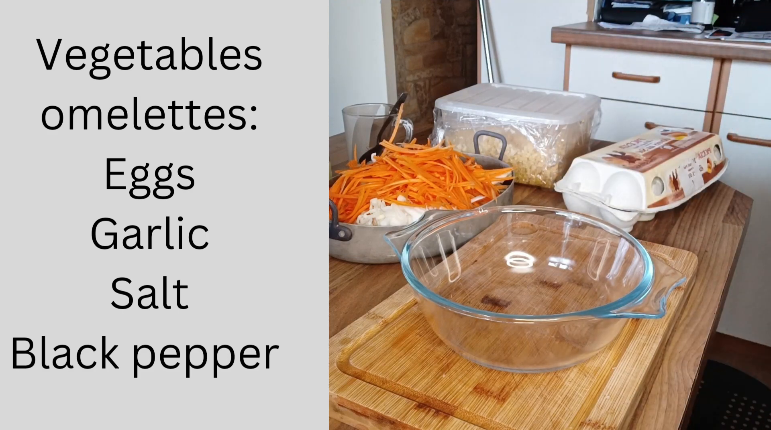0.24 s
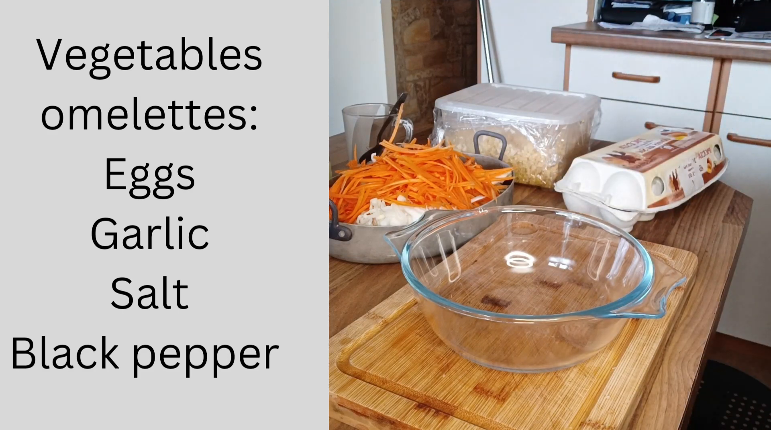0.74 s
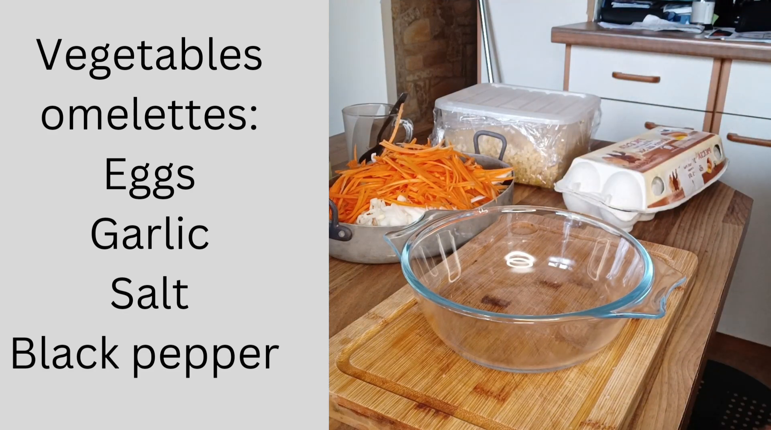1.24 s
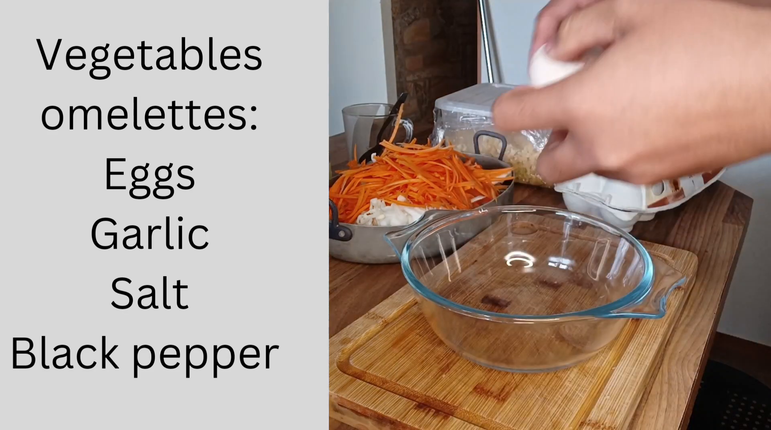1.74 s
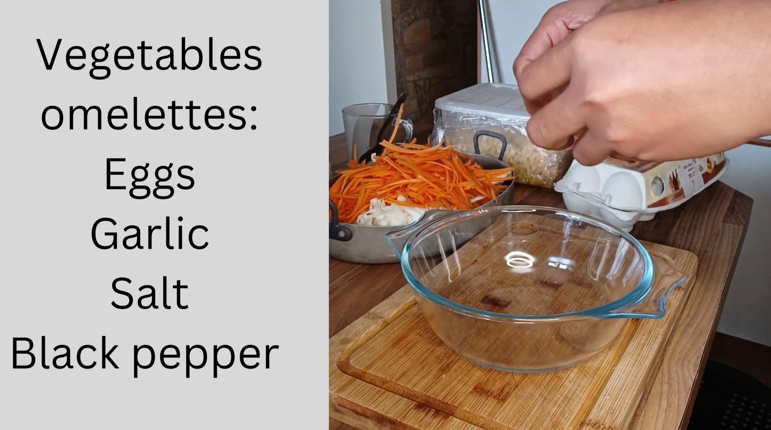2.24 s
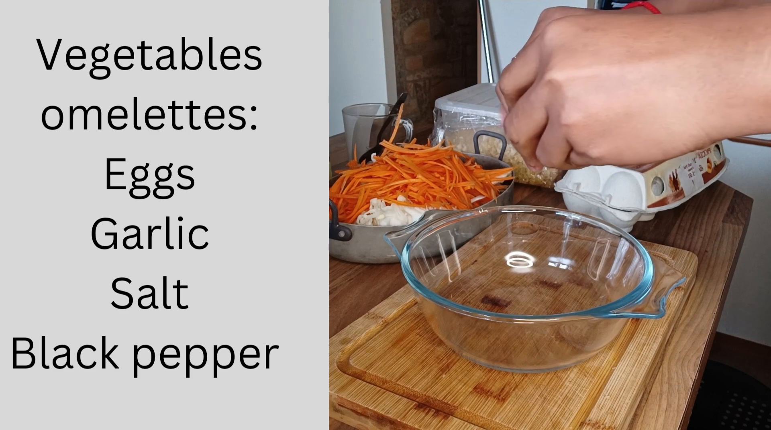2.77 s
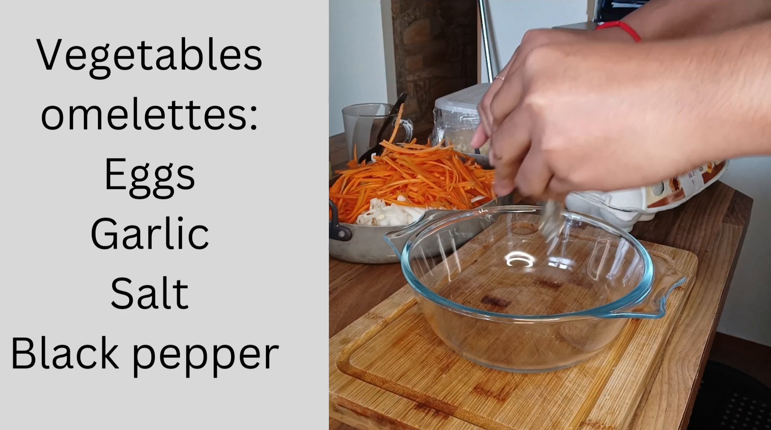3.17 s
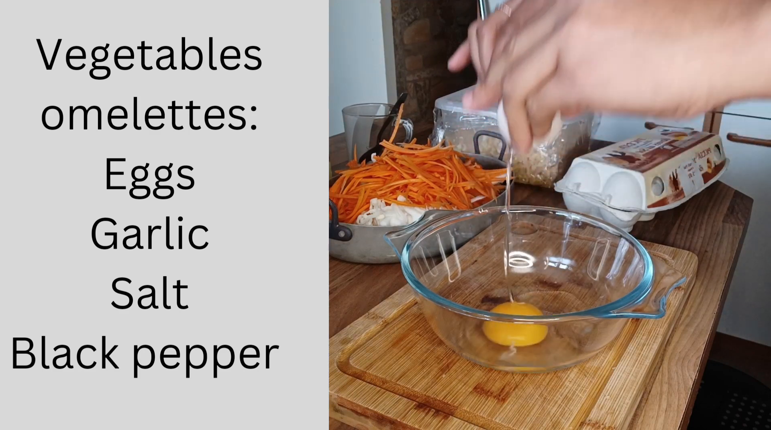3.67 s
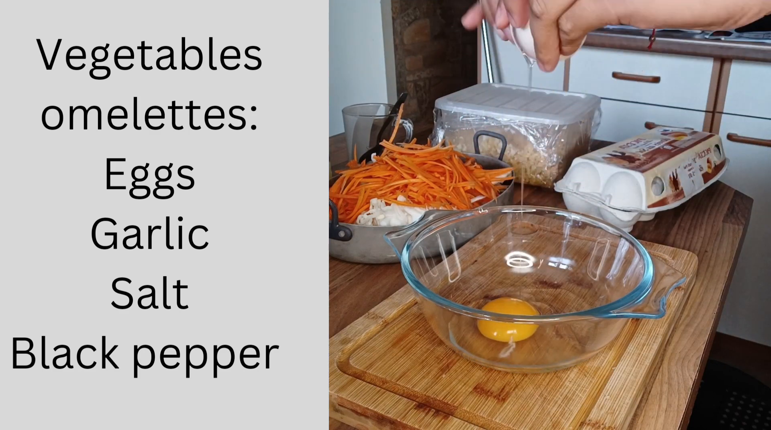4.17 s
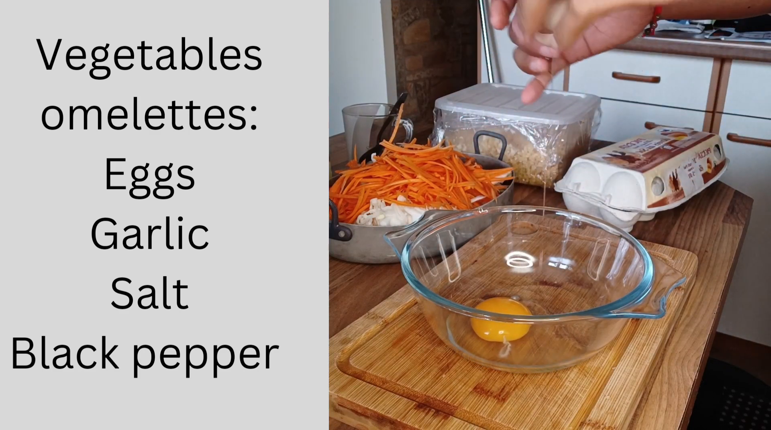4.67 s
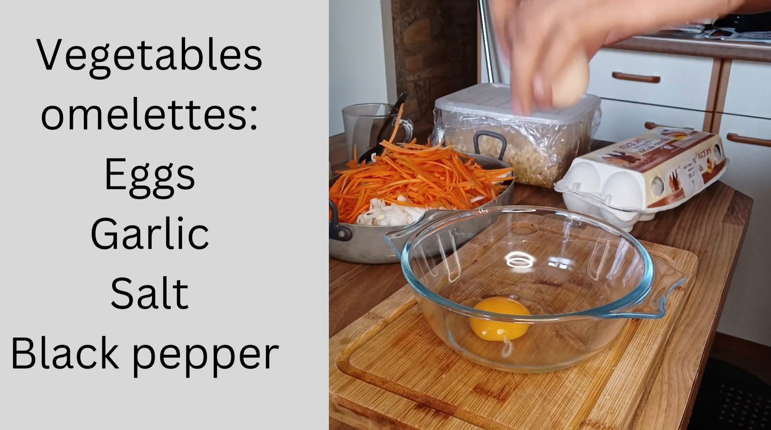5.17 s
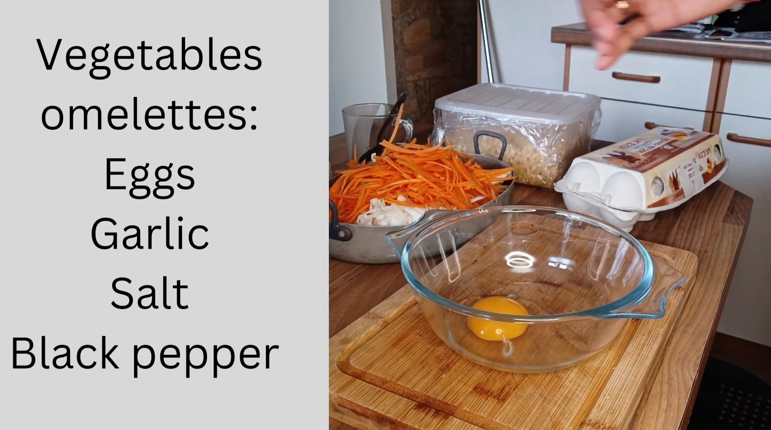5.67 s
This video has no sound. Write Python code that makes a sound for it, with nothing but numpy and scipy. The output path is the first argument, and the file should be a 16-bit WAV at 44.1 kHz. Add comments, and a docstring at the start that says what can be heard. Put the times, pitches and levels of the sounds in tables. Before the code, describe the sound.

A faint appliance hum and soft room air run throughout, heard from a microphone close to a wooden kitchen table. At about 0.8 and 1.2 seconds an egg is knocked twice; each blow is a sharp shell crack with a resonant thud through the table top, the second slightly softer. These are the loudest sounds. At 2.4 seconds the shell snaps lightly as fingers pry it, followed by faint crackling and a crisper break near 3.1 seconds, with a quick run of hollow ticks. From about 3.2 to 3.8 seconds the egg slides into a glass bowl with a very soft squelch, a few tiny bubbles and more shell snaps. The empty halves click and tick around 4.3 and 4.6 seconds, and once more at 5 seconds. Hard walls nearby give the cracks a short echo. Only the hum remains until almost 6 seconds.

```python
"""Cracking an egg in a kitchen

Close on a wooden table, one small microphone. An egg is knocked twice, shaking the table top, then
pried open over a glass bowl: the shell snaps and crackles, its hollow halves tick together, and the
egg slides out softly with a few bubbles. Hard walls close by answer the cracks and ticks; an
appliance hums faintly in the background."""
import sys
import numpy as np
from scipy import signal
from scipy.fft import rfft, irfft, next_fast_len
from scipy.io import wavfile
from scipy.ndimage import uniform_filter1d, minimum_filter1d, map_coordinates

SR = 44100
rng = np.random.default_rng(int(sys.argv[2]) if len(sys.argv) > 2 else 0)


def wav_record(signal):
    """Record a signal, one row per channel, as 16-bit PCM in the file named by sys.argv[1]."""
    frames = np.transpose(np.atleast_2d(signal))
    bounded = np.clip(frames, -1, 1)
    # unit amplitude maps onto the largest positive 16-bit level
    quanta = np.round(bounded * 32767).astype(np.int16)
    wavfile.write(sys.argv[1], SR, quanta)


N = 261072

# Event levels are relative: each source adds its own gain.
# blows on the table: t/s, thud/dB, low thump/dB, crack/dB, swell time/s, early t60/s
KNOCKS = [(0.7742, 1.5, -22.5, -16.5, 0.034, 0.43), (1.2277, -1, -19, -15.5, 0.012, 0.38)]
# thud spectra, the whole egg hitting hard and the dented egg softer: f/Hz, level/dB
HARD_BLOW = [(45, -47.5), (75, -23.5), (170, -7.5), (270, -14.5), (650, -6.5), (1000, -5.5), (1400, 0.5),
             (2150, -12), (2900, -17), (3500, -30), (6500, -27.5), (9400, -24.5), (12000, -34.5),
             (16000, -45.5)]
SOFT_BLOW = [(45, -46), (75, -12), (130, -8.5), (270, -8), (850, -10.5), (1080, -4.5), (1550, -8),
             (1850, -25), (2150, -9), (2750, -22), (3100, -20), (3450, -28.5), (6900, -31), (9500, -20.5),
             (16000, -44.5)]
# modes of the table and what stands on it: f/Hz, level/dB
TABLE_MODES = [(75, 10), (101, 6.5), (117, -7.5), (139, -1), (166, 7), (215, 10.5), (323, 10), (370, 2),
               (431, 0), (447, -0.5), (502, 6), (651, 0.5), (678, 7), (747, -1), (807, 8.5), (1011, 6.5),
               (1140, -2), (1194, -8.5), (1332, -3), (1361, 1.5), (1388, -3.5), (1416, -1), (1581, 7.5),
               (1672, 3), (1704, 5.5), (1749, 7), (2160, -3), (2260, -0.5), (2729, 2.5), (2902, 8)]
# spectrum of the countless weak modes between them: f/Hz, level/dB
WEAK_MODES = [(100, 0.5), (400, -1), (1500, -1), (2500, -1.5)]
# the deep bass is cut from the knocks: f/Hz, gain/dB
KNOCK_LOW_CUT = [(52, -19.5), (70, -1.5)]
# the shell breaks: t/s, crack/dB, brightness/dB, hollow ring/dB, ring f/Hz
SNAPS = [(2.42, -34.5, -6, -28, 1420), (2.445, -33, -5, -32.5, 1510), (2.751, -51, -2, -58, 2220),
         (2.853, -53, 8, -66, 1700), (3.0788, -33, -20, -34, 1860), (3.0801, -27.5, -27, -38, 1950),
         (3.0875, -32, 11, -35, 2030), (3.364, -42, -5, -55, 1900), (3.477, -46, 9, -56, 3540),
         (3.5846, -35, 13, -29, 1970), (3.732, -48.5, 9, -44, 2390), (3.813, -44.5, 0, -42.5, 2520),
         (4.261, -42, 0, -40, 2570), (4.326, -42, -1, -44, 2070), (4.342, -41.5, 5, -44, 2110),
         (4.621, -33, 1.5, -33.5, 2280), (4.86, -48.5, -9, -60, 2320)]
# spectrum of a shell crack, with the microphone's bright peak near 9.5 kHz: f/Hz, level/dB
CRACK_SPECTRUM = [(300, -25.5), (900, -16.5), (2600, 2.5), (4300, -9), (6100, -5), (7800, -4), (9600, 5),
                  (11500, -7), (13500, -9.5), (16000, -15)]
# the halves touch: t/s, ring/dB, ring f/Hz, click of the broken edges/dB
TICKS = [(3.111, -30.5, 2950, -30), (3.1437, -27, 2390, -42.5), (3.1768, -30.5, 2190, -50),
         (3.2025, -40, 2140, -57), (3.271, -47, 1730, -60), (3.5625, -45, 2250, -63),
         (3.5696, -40.5, 2050, -54), (3.799, -45.5, 2370, -51.5), (4.577, -29.5, 2170, -51),
         (4.5874, -33, 2270, -54), (4.664, -39.5, 2050, -54), (5.0225, -35, 1870, -45.5)]
# the fingers squeeze the egg: t/s, hold/s, crackle/dB, fracture rate/Hz, wet sound/dB
SQUEEZES = [(2.414, 0.032, -60, 750, -57), (2.745, .21, -82, 82, -69), (3.08, 0.043, -59, 700, -52),
            (3.358, .05, -92, 230, -62.5), (3.551, 0.021, -73, 360, -54.5), (3.775, .03, -90, 200, -61.5),
            (4.594, 0.018, -70, 480, -54.5), (4.836, 0.1, -78, 340, -64)]
# spectrum of the hollow under tiny fractures: f/Hz, level/dB
HOLLOW_SPECTRUM = [(800, -29), (1700, 0.5), (2800, -3), (3800, -11), (7000, -35)]
# spectrum of the sliding egg: f/Hz, level/dB
WET_SPECTRUM = [(50, -3), (90, 4), (200, -1), (350, -8.5), (700, -10), (1800, -14.5), (3000, -24),
                (6000, -40)]
# bubbles in the egg white: t/s, ring/dB, ring f/Hz
BUBBLES = [(3.25, -51.5, 3000), (3.321, -56.5, 3190), (3.3515, -42, 1780), (3.478, -54, 3540),
           (3.537, -44.5, 1840)]
# reverberation of the kitchen: f/Hz, t60/s
KITCHEN_DECAY = [(100, 0.25), (500, 0.52), (2000, 0.22), (6000, 0.23), (10000, 0.2), (16000, 0.21)]
# spectrum of the room's air: f/Hz, level/dB
AIR_SPECTRUM = [(25, 3.5), (50, -14.5), (72, -5), (150, -8.5), (400, -15.5), (800, -20), (1700, -14.5),
                (3000, -25), (4200, -33.5), (6200, -39), (7700, -35.5), (9200, -28), (12000, -43.5),
                (16000, -43.5)]
# its slow rise and fall: t/s, level/dB
AIR_LEVEL = [(0, -67), (1.2, -63.5), (1.9, -66.5), (3, -65), (4.1, -65.5), (5.3, -63.5), (5.9, -64.5)]
# hum and faint whine of the appliance: f/Hz, rms level/dB
HUM_TONES = [(100, -71), (595, -71.5), (645, -85.5), (744, -87.5), (3560, -97), (4960, -98), (8430, -99),
             (8985, -97)]


def knocks(onset_gain=0.64, modes_db=-30, ring_rise_s=0.0013, thump_hz=122, thump_t60=0.07):
    """Each blow cracks the shell and shakes the table; the thud holds, as if compressed, then dies."""
    out, t = np.zeros(N), np.arange(SR // 2) / SR
    for (s, thud_db, thump_db, crack_db, swell_s, t60), blow in zip(KNOCKS, (HARD_BLOW, SOFT_BLOW)):
        ring = sum(amp(modes_db + db + rng.normal(0, 1)) * np.sin(2 * np.pi * (hz * t + rng.random()))
                   for hz, db in TABLE_MODES)
        ring *= 1 - np.exp(-t / ring_rise_s)
        weak_modes = coloured(rng.standard_normal(len(t)), WEAK_MODES)
        swell = 1 - (1 - onset_gain) * np.exp(-(t / swell_s) ** 2)  # briefly offsets the decay
        decay = amp(-60 * t / t60) * np.exp(-(t / (0.78 * t60)) ** 4)  # the tail's end falls faster
        thud = amp(thud_db) * coloured((ring + weak_modes) * swell * decay, blow)
        thump = amp(thump_db - 60 * t / thump_t60) * np.sin(2 * np.pi * thump_hz * t)  # the top bounces
        wood = coloured(thud + thump, KNOCK_LOW_CUT)
        crack = amp(crack_db + 10) * fracture(t, t60=0.021, bright_db=4.5)
        add(out, s, wood + kitchen(crack, wet_db=-4.5))
    return out


def snaps(ring_t60=0.0034):
    """Over the bowl the shell cracks sharply and rings its hollow for an instant."""
    out = np.zeros(N)
    for s, crack_db, bright_db, ring_db, hz in SNAPS:
        add(out, s, click(ring_db, hz, ring_t60, crack_db, bright_db))
    return out


def ticks(ring_t60=0.0068):
    """The two halves touch: mostly hollow ring, with a click from the broken edges."""
    out = np.zeros(N)
    for s, ring_db, hz, edge_db in TICKS:
        add(out, s, click(ring_db, hz, ring_t60, edge_db, bright_db=-9))
    return out


def crackle(spread_db=4, gain_db=2):
    """Tiny fractures run through the shell under the thumbs; some of them ring its hollow."""
    out, t = np.zeros(N), np.arange(SR) / SR
    def grains(spectrum, rate):
        impulses = (rng.random(len(t)) < rate / SR) * amp(spread_db * rng.standard_normal(len(t)))
        return unit(coloured(impulses, spectrum))
    for s, hold, db, rate, _ in SQUEEZES:
        shell = grains(CRACK_SPECTRUM, rate) + grains(HOLLOW_SPECTRUM, rate)
        pressure = squeeze(t, hold, attack_s=0.016, release_db_per_s=298)
        add(out, s, amp(db + gain_db) * shell * pressure)
    return kitchen(out, wet_db=1)


def squelch(lumpy_db=-1.5, gain_db=-5):
    """The egg follows each squeeze slowly, shifting and sliding in soft lumps."""
    flow, t = np.zeros(N), np.arange(SR) / SR
    for s, hold, _, _, db in SQUEEZES:
        add(flow, s, amp(db) * squeeze(t, hold, attack_s=0.038, release_db_per_s=94))
    return noise(WET_SPECTRUM, N) * flow * amp(lumpy_db * wobble(30) + gain_db)


def bubbles(ring_t60=0.023):
    """As the white runs out, a bubble's film bursts faintly; it rings longer than the shell does."""
    out = np.zeros(N)
    for s, ring_db, hz in BUBBLES:
        add(out, s, click(ring_db, hz, ring_t60, crack_db=ring_db - 13.5, bright_db=1))
    return out


def click(ring_db, hz, ring_t60, crack_db, bright_db):
    """A sharp crack and the small cavity that it rings, both answered by the kitchen."""
    t = np.arange(SR // 2) / SR
    ring = amp(ring_db - 2) * cavity(t, hz, ring_t60)
    crack = amp(crack_db + 8) * fracture(t, t60=0.011, bright_db=bright_db)
    return kitchen(ring, wet_db=-2.5) + kitchen(crack, wet_db=1.5)


def fracture(t, t60, bright_db):
    """A brittle fracture: coarse cracks ring near 6 kHz, fine ones an octave higher."""
    burst = coloured(rng.standard_normal(len(t)) * amp(-60 * t / t60), CRACK_SPECTRUM)
    tilt = [(4000, 1.5), (6000, -bright_db / 2), (8200, bright_db / 6), (13500, bright_db / 2)]
    crack = coloured(burst, tilt)
    return crack / np.linalg.norm(crack)


def cavity(t, hz, t60, rise_s=0.00041, upper_ratio=1.224):
    """Two modes of a small cavity ring briefly; the upper one starts weaker."""
    envelope = (1 - np.exp(-t / rise_s)) * amp(-60 * t / t60)
    upper = amp(-9 - 60 * t / 0.0082) * np.sin(2 * np.pi * upper_ratio * hz * t)
    return envelope / envelope.max() * (np.sin(2 * np.pi * hz * t) + upper)


def squeeze(t, hold, attack_s, release_db_per_s):
    """Gain of one squeeze: it builds up, holds and lets go."""
    return np.minimum(1, t / attack_s) * amp(-release_db_per_s * np.maximum(0, t - attack_s - hold))


def kitchen(x, wet_db, build_s=0.0057):
    """The direct sound, then dense reflections off the near walls that build up and die by band."""
    hz, t, bands = signal.stft(rng.standard_normal(SR // 2), SR, nperseg=256)
    decay = amp(-60 * t / along(KITCHEN_DECAY, hz)[:, None])
    _, tail = signal.istft(bands * decay, SR, nperseg=256)
    tail *= 1 - np.exp(-np.arange(len(tail)) / SR / build_s)
    return x + amp(wet_db) * signal.fftconvolve(x, tail / np.linalg.norm(tail))[:len(x)]


def room_tone(waver_db=-1.55, drift_rad=0.25):
    """In the background, kitchen air and a slightly unsteady appliance hum."""
    hum, t = np.zeros(N), np.arange(N) / SR
    for hz, db in HUM_TONES:
        peak = np.sqrt(2) * amp(db + waver_db * wobble(7.9))
        hum += peak * np.sin(2 * np.pi * hz * t + drift_rad * wobble(5.7))
    return hum + level(AIR_LEVEL) * noise(AIR_SPECTRUM, N)


def amp(db):
    """Decibels to gain."""
    return 10 ** (np.asarray(db) / 20)


def unit(x):
    """Scale to rms 1."""
    return x / np.sqrt(np.mean(x ** 2) + 1e-20)


def along(points, hz):
    """Read (f/Hz, value) points on a log frequency axis."""
    freqs, values = np.transpose(points)
    return np.interp(np.log(hz + 1), np.log(freqs), values)


def level(rows):
    """Turn (t/s, level/dB) rows into one gain per sample."""
    return amp(np.interp(np.arange(N) / SR, *np.transpose(rows)))


def wobble(rate):
    """A smooth random curve, rate knots a second."""
    knots = rng.standard_normal(int(N * rate / SR) + 4)
    return map_coordinates(knots, [np.arange(N) * rate / SR])


def add(track, s, sound):
    """Mix a sound into the track at time s."""
    part = track[round(s * SR):][:len(sound)]
    part += sound[:len(part)]


def coloured(x, spectrum):
    """Pass x through a minimum-phase filter with the given (f/Hz, level/dB) points."""
    size = 2 * next_fast_len(len(x) // 2 + 4096)
    gain = amp(along(spectrum, np.fft.rfftfreq(size, 1 / SR)))
    cepstrum = irfft(np.log(gain))
    cepstrum[1:size // 2] *= 2  # folded onto positive time: no pre-ringing
    cepstrum[size // 2 + 1:] = 0
    return irfft(rfft(x, size) * np.exp(rfft(cepstrum)))[:len(x)]


def noise(spectrum, count):
    """Coloured noise of rms 1."""
    return unit(coloured(rng.standard_normal(count), spectrum))


def limiter(x, ceiling_db=-11, window=221):
    """The gain dips briefly around peaks above the ceiling."""
    needed = np.minimum(1, amp(ceiling_db) / (np.abs(x) + 1e-9))
    return x * uniform_filter1d(minimum_filter1d(needed, window), window)


def scene():
    """All sources at one microphone by the table."""
    return (knocks() + snaps() + ticks() + bubbles() + crackle() + squelch() + room_tone())[None]


def record(dry, low_hz=58, top_hz=16100):
    """The small microphone loses the deep bass; the recorder limits peaks and bandwidth."""
    thin = signal.sosfilt(signal.butter(4, low_hz, "highpass", fs=SR, output="sos"), dry)
    size = next_fast_len(N + SR // 2)
    passband = np.fft.rfftfreq(size, 1 / SR) < top_hz
    return irfft(rfft(limiter(thin), size) * passband, size)[:, :N]


dry = scene()
out = record(dry)
wav_record(out)
```